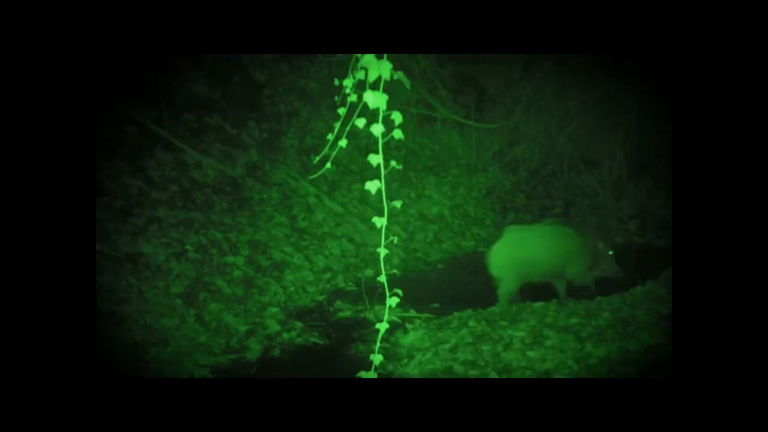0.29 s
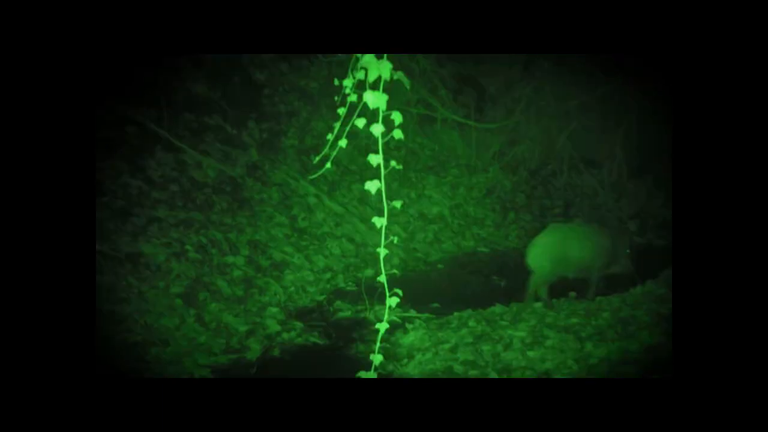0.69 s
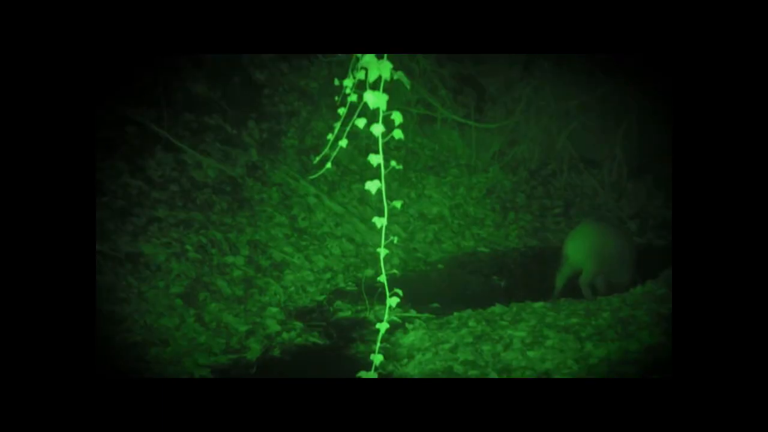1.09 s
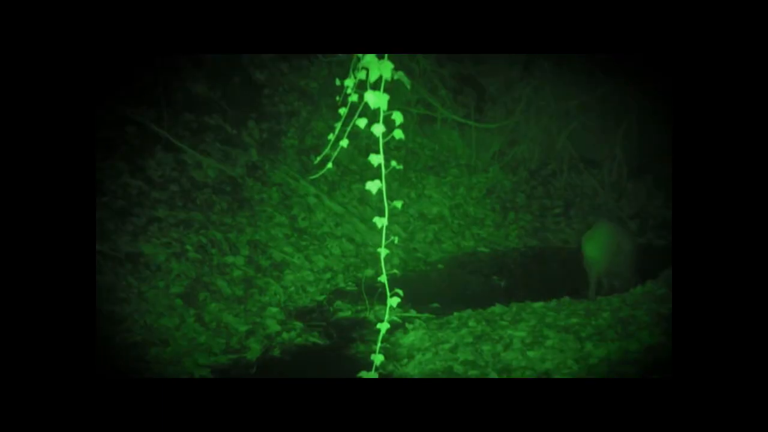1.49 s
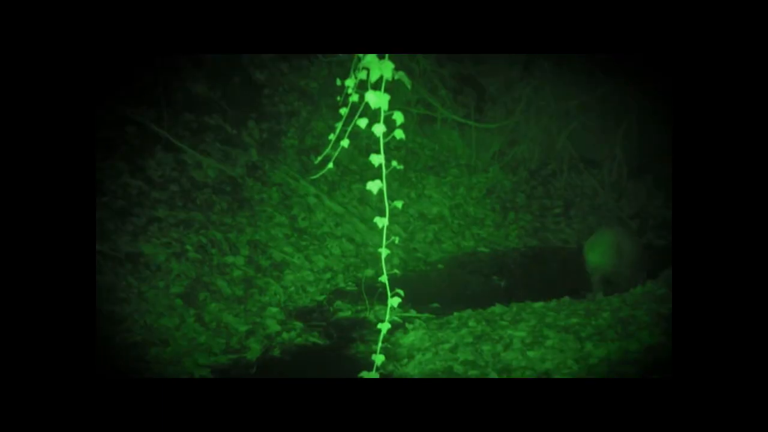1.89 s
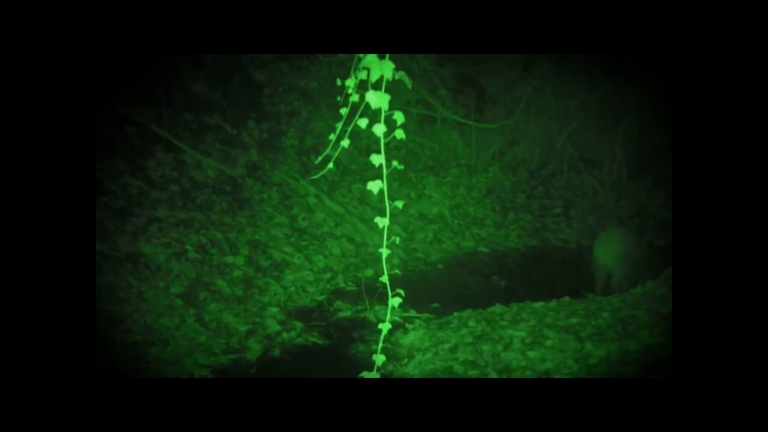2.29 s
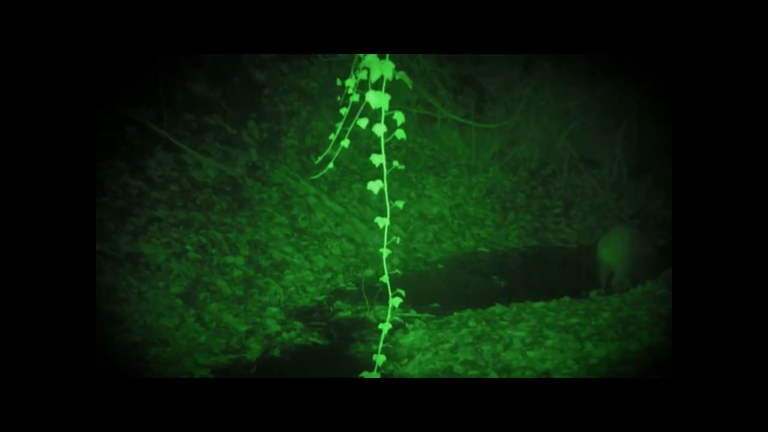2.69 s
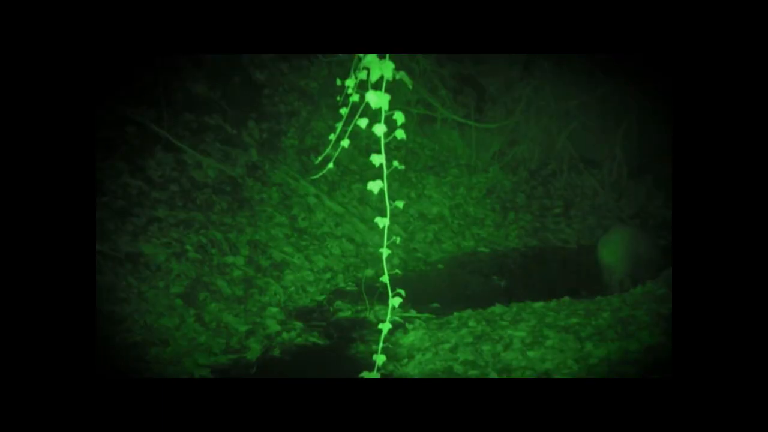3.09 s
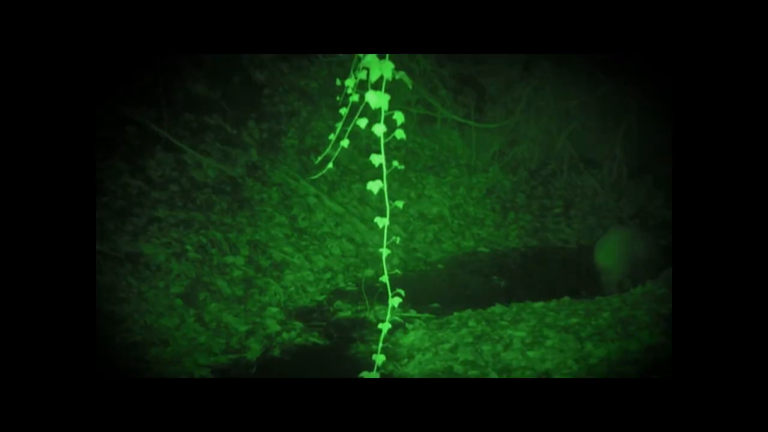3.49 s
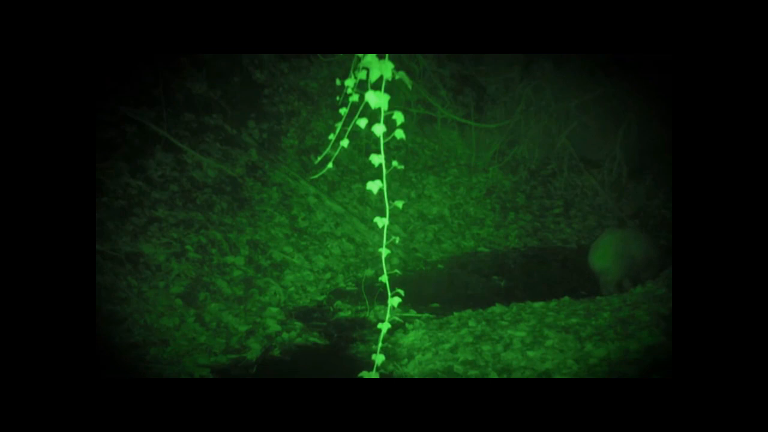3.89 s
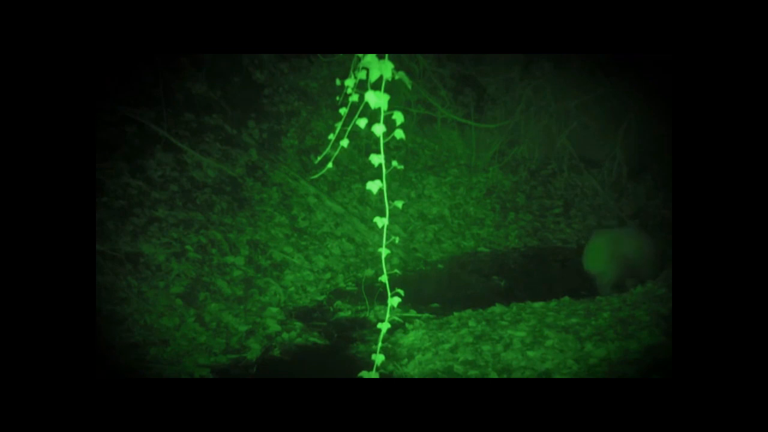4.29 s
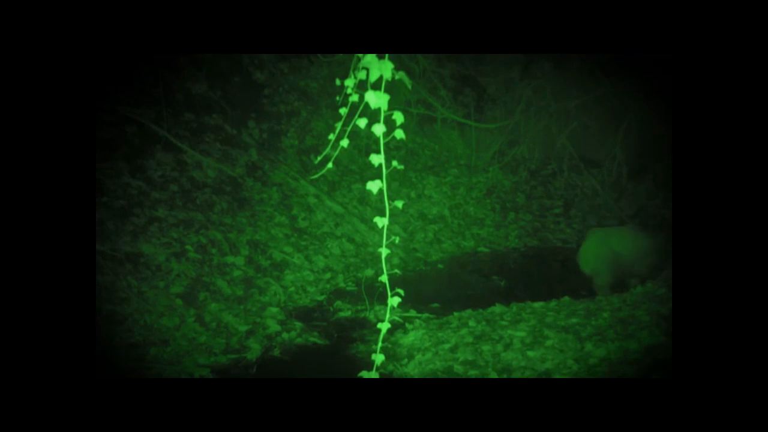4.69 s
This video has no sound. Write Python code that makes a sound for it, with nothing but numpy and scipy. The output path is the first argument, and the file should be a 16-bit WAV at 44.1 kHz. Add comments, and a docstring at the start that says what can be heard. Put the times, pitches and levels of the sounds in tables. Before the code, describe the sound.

Faint night hiss and a thin high camera whine open, with a tiny triple click from the housing. Then a wild boar some metres away shoves through dry leaf litter: crackling swells, twigs snap, three short low grunts come between. The middle is loudest, then it eases, with two soft sniffs near the end. Mono, fixed camera microphone, outdoors on soft ground.

```python
"""Faint night hiss and a thin camera whine come first; the housing then ticks once, three close clicks.
A wild boar roots through dry leaf litter some metres away: cracks and hiss swell at each shove.
Twigs snap as short rings with splintering noise; two sniffs are noise through nostril resonances.
Three grunts are slow vocal pulses ringing throat, mouth and snout over a chest hum."""
import sys
import numpy as np
from scipy import signal
from scipy.fft import rfft, irfft, next_fast_len
from scipy.io import wavfile
from scipy.ndimage import map_coordinates

SR = 44100
rng = np.random.default_rng(int(sys.argv[2]) if len(sys.argv) > 2 else 0)


def transcribe(signal):
    """Save signal, clipped to [-1, 1], as a 16-bit WAV file at the path in sys.argv[1]."""
    frames = np.atleast_2d(signal).T
    limited = np.clip(frames, -1, 1)
    pcm = np.round(limited * 32767).astype(np.int16)
    wavfile.write(sys.argv[1], SR, pcm)


def rack_gain(trim_db):
    """Turn a fader trim in dB into the linear factor to multiply a signal by."""
    fader = np.asarray(trim_db, float)
    return 10 ** (fader / 20)


N = 218293


def unit(x):
    """Scaled to rms 1."""
    return x / np.sqrt(np.mean(x ** 2) + 1e-20)


def along(points, hz):
    """(Hz, value) points interpolated on a log frequency axis."""
    point_hz, value = np.transpose(points)
    return np.interp(np.log(hz + 1), np.log(point_hz + 1), value)


def curves(rows):
    """One value per sample for each column after the time."""
    time_s, *columns = np.transpose(rows)
    return [np.interp(np.arange(N) / SR, time_s, column) for column in columns]


def wobble(knots_per_s):
    """A smooth random curve."""
    knots = rng.standard_normal(int(N * 200 / SR) + 4)
    return map_coordinates(knots, [np.arange(N) * knots_per_s / SR])


def filtered(x, response):
    """x times a complex response of frequency."""
    size = next_fast_len(N + SR // 2)
    return irfft(rfft(x, size) * response(np.fft.rfftfreq(size, 1 / SR)), size)[:N]


def resonances(hz, modes):
    """Causal response of (Hz, width Hz, dB) resonances, alternating in sign."""
    total = 0
    for k, (center_hz, width_hz, db) in enumerate(modes):
        band = 1j * hz * width_hz
        total = total + (-1) ** k * rack_gain(db) * band / (center_hz ** 2 - hz * hz + band)
    return total


def ground(x, t60_s, level_db):
    """x with the short scattered answer of soil and bushes, a decaying noise tail."""
    t = np.arange(SR // 4) / SR
    tail = rng.standard_normal(len(t)) * rack_gain(-60 * t / t60_s)
    return x + rack_gain(level_db) * signal.fftconvolve(x, tail / np.linalg.norm(tail))[:N]


# night hiss spectrum, relative: hz [Hz], density_db [dB per Hz]
NIGHT_SPECTRUM = [(15, -48), (25, -6.5), (455, 5.5), (796, 5), (1920, 1.5), (6350, -23), (7860, -47),
                  (8740, -34), (14500, -31)]


def night():
    """Faint steady hiss: noise shaped by a fixed spectrum."""
    noise = rng.standard_normal(N)
    return rack_gain(-51.5) * unit(filtered(noise, lambda hz: rack_gain(along(NIGHT_SPECTRUM, hz))))


# camera electronics tone: pitch_hz [Hz], sign_flips_per_s [1/s], base_db [dB]
WHINE_TONE = (7797.5, 59.3, -67)
# whine level: time_s [s], gain_db [dB re base]
WHINE_GAIN = [(0, -6), (.2, -8), (.45, 0.5), (4.95, 0.5)]


def whine():
    """Camera electronics whine: a sine that flips sign regularly, with soft flips."""
    t = np.arange(N) / SR
    pitch_hz, sign_flips_per_s, base_db = WHINE_TONE
    flips = np.tanh(6 * np.sin(np.pi * sign_flips_per_s * t))
    tone = np.sqrt(2) * rack_gain(base_db) * np.sin(2 * np.pi * pitch_hz * t) * flips
    return rack_gain(curves(WHINE_GAIN)[0]) * tone


# camera housing clicks: start_s [s], click_db [dB], thump_db [dB re click]
HOUSING_CLICKS = [(0.2307, -27.5, -14), (0.2405, -19, -9), (0.251, -38, -20)]
# housing flexing around the clicks: center_s [s], half_length_s [s], level_db [dB], corner_hz [Hz]
HOUSING_CREAK = (.237, .009, -38, 700)


def housing():
    """The housing flexes: sharp clicks with a rattling tail and a low thump, amid a dull noise creak."""
    out, t = np.zeros(N), np.arange(N) / SR
    u = t[:SR // 20]
    for start_s, click_db, thump_db in HOUSING_CLICKS:
        tail = 0.043 * rack_gain(-60 * u / 0.045) * rng.standard_normal(len(u))
        click = -np.exp(-u / .00008) + tail
        thump = -rack_gain(thump_db) * np.exp(-u / 0.0009) * np.cos(2 * np.pi * 45 * u)
        out[round(start_s * SR):][:len(u)] += rack_gain(click_db) * (click + thump)
    center_s, half_length_s, level_db, corner_hz = HOUSING_CREAK
    dull = unit(filtered(rng.standard_normal(N), lambda hz: 1 / (1 + 1j * hz / corner_hz) ** 2))
    return out + rack_gain(level_db) * np.exp(-((t - center_s) / half_length_s) ** 4) * dull


def sizes(luck, spread_db):
    """Most cracks are small, a few larger, none beyond what one leaf can give."""
    return rack_gain(-spread_db * np.log(1 - .995 * luck))


def grains(count, cycles, spread_db):
    """Tiny cracks at random times: damped rings of random pitch, flat in spectrum on average."""
    when, pitch, luck = rng.random((count, 3)).T
    hz = (150 * 100 ** pitch)[:, None]
    t = np.arange(320) / SR
    size = sizes(luck, spread_db)[:, None] * hz
    ring = size * np.sin(2 * np.pi * hz * t) * np.exp(-t * hz / cycles)
    at = (when * N).astype(int)[:, None] + np.arange(len(t))
    return unit(np.bincount(at.ravel(), ring.ravel())[:N])


def clicks(count, spread_db):
    """Cracks too short to ring: they fill every pitch at once."""
    when, luck, sign = rng.random((count, 3)).T
    size = sizes(luck, spread_db) * np.sign(sign - .5)
    return unit(np.bincount((when * N).astype(int), size, N))


# leaves settling between the shoves: time_s [s], crunch_db [dB]
SETTLING = [(0.0, -65.5), (0.27, -57.5), (0.46, -37.5), (0.7, -47), (0.92, -46.5), (1.13, -45),
            (1.43, -47.5), (1.75, -44), (2.15, -44.5), (2.35, -31.5), (2.6, -36.5), (3.06, -41),
            (3.46, -39), (3.6, -41.5), (3.9, -42.5), (4.0, -45.5), (4.5, -49), (4.95, -43.5)]
# hooves and snout shoving the litter:
# peak_s [s], crunch_db [dB], rise_s [s], fall_s [s], crumbs_db [dB re crunch]
SHOVES = [(0.333, -40.5, .043, 0.04, -23.5), (0.368, -35.5, 0.0069, 0.012, -40),
          (0.468, -40, .0067, 0.0072, -31), (0.502, -30.5, 0.0018, 0.011, -29),
          (0.653, -45, 0.028, 0.048, -43), (0.806, -41.5, 0.01, 0.0082, -36),
          (0.918, -42.5, .031, .019, -24), (1.043, -41, 0.024, 0.019, -23),
          (1.104, -37.5, 0.0054, 0.022, -25), (1.183, -39, 0.013, 0.0073, -36),
          (1.225, -37, 0.019, 0.022, -23), (1.267, -37, 0.026, 0.03, -29), (1.395, -37.5, 0.01, 0.045, -27),
          (1.492, -39.5, 0.031, 0.039, -24), (1.586, -33.5, 0.0097, 0.047, -28.5),
          (1.716, -35.5, 0.024, 0.019, -25), (1.818, -36.5, 0.04, .027, -28),
          (1.921, -38.5, 0.03, 0.04, -30), (2.045, -43, 0.0085, 0.025, -19), (2.113, -32, 0.01, 0.011, -16),
          (2.168, -33.5, 0.022, 0.015, -20.5), (2.232, -23, .0015, 0.021, -24),
          (2.29, -33, .025, 0.034, -21.5), (2.422, -30.5, 0.039, 0.027, -25.5),
          (2.473, -30.5, .002, 0.047, -20), (2.618, -34.5, 0.0058, 0.011, -31),
          (2.691, -27.5, 0.016, .039, -21.5), (2.853, -28, 0.0069, 0.03, -25.5),
          (2.958, -36.5, 0.12, 0.012, -23.5), (3.122, -27.5, 0.026, 0.031, -21.5),
          (3.22, -30, 0.0022, 0.023, -32), (3.267, -36, 0.0058, 0.015, -40),
          (3.328, -29.5, 0.013, 0.013, -20), (3.35, -29, 0.011, 0.016, -22.5),
          (3.441, -31, 0.0024, 0.0084, -19), (3.496, -31, 0.013, .013, -21),
          (3.569, -36, 0.004, 0.023, -26), (3.605, -32, 0.039, 0.033, -25), (3.782, -36, 0.017, .022, -35),
          (3.848, -30.5, 0.032, 0.027, -21), (4.036, -36, 0.009, 0.023, -26),
          (4.138, -38.5, 0.064, 0.052, -22), (4.42, -40.5, 0.068, 0.11, -23),
          (4.652, -34.5, 0.033, 0.014, -24), (4.685, -37.5, .01, 0.025, -25),
          (4.93, -45.5, 0.016, .03, -19)]
# the boar walks from a drift of big leaves onto finer litter: time_s [s], big_leaves_db [dB re crunch]
LEAF_DRIFT = [(0, 1), (.7, 0.5), (1.3, 0), (2.0, -3), (2.24, -8), (2.3, 2.5), (2.38, -10), (3.0, -9.5),
              (4.0, -6), (4.95, -8)]


def stirring():
    """Levels of crunch, big leaves and crumbs: each shove adds power over the settling litter."""
    t = np.arange(N) / SR
    crunch_power = rack_gain(curves(SETTLING)[0]) ** 2
    crumbs_power = crunch_power * rack_gain(-25) ** 2
    for peak_s, crunch_db, rise_s, fall_s, crumbs_db in SHOVES:
        width_s = np.where(t < peak_s, rise_s, fall_s)
        swell = rack_gain(crunch_db) ** 2 * np.exp(-((t - peak_s) / width_s) ** 2)
        crunch_power = crunch_power + swell
        crumbs_power = crumbs_power + rack_gain(crumbs_db) ** 2 * swell
    big_power = crunch_power * rack_gain(curves(LEAF_DRIFT)[0]) ** 2
    return np.sqrt([crunch_power, big_power, crumbs_power])


# litter spectrum, relative within each band: hz [Hz], density_db [dB per Hz]
LITTER_SPECTRUM = [(18, -62), (30, -33), (70, -19.5), (131, -20), (316, -10), (529, -4.5), (602, -2.5),
                   (1310, 5), (2840, 3.5), (4650, -7.5), (7400, -30), (8000, -34.5), (8640, -33.5),
                   (14500, -39.5)]


def leaves():
    """Cracks and hiss come in clumps; big leaves give the body, crumbs the crisp top."""
    rings = grains(count=16000, cycles=2.4, spread_db=3.0)
    cracks = .72 * rings + .25 * clicks(count=16000, spread_db=1.8)
    rustle = cracks + .7 * rng.standard_normal(N)
    clumped = rustle * rack_gain(1.53 * wobble(30) + 0.95 * wobble(90))

    def low(hz):
        return 1 / (1 + (hz / 1000) ** 4)

    def high(hz):
        return 1 / (1 + (6500 / (hz + 1)) ** 8)

    def middle(hz):
        return 1 - low(hz) - high(hz)

    def band(share):
        return unit(filtered(clumped, lambda hz: share(hz) * rack_gain(along(LITTER_SPECTRUM, hz))))

    return np.sum(stirring() * [band(middle), band(low), band(high)], axis=0)


# twigs and stiff leaves breaking: start_s [s], level_db [dB], ring_hz [Hz], crack_db [dB re level]
BREAKS = [(0.276, -31, 1200, 3), (0.325, -25, 684, 1), (0.363, -22, 640, -3), (0.5, -29.5, 590, 16.5),
          (0.794, -38, 820, -3), (1.099, -25, 1110, 5), (1.166, -28, 1130, 4), (1.388, -22, 1120, -1.5),
          (1.485, -29, 1340, 10.5), (1.57, -24, 848, 4), (1.716, -25.5, 640, 6), (1.807, -25, 800, 5),
          (1.866, -24.5, 1690, 5), (1.911, -16.5, 970, -3), (1.973, -17, 1450, 1.5), (2.027, -30, 990, 9.5),
          (2.098, -19, 1250, -2.5), (2.16, -22.5, 1700, 1), (2.23, -11, 2440, -3), (2.368, -22, 1940, 2),
          (2.47, -12, 1990, -9), (2.826, -15.5, 1640, -0.5), (2.849, -16, 1900, 0), (3.012, -32, 1500, 7),
          (3.045, -23.5, 1320, 8.5), (3.219, -22.5, 680, 5.5), (3.261, -9.5, 1090, -5),
          (3.346, -21, 1430, 11), (3.413, -13.5, 1590, 7), (3.4395, -24, 2160, 9), (3.479, -17.5, 1380, 3),
          (3.567, -25, 1790, 4), (3.58, -40, 8300, 10), (3.825, -28, 1260, 12), (3.86, -27, 990, -3),
          (4.046, -17, 1330, -1), (4.069, -26, 1220, 5), (4.121, -32, 950, 7), (4.148, -33, 910, -7),
          (4.399, -29, 850, 9.5), (4.465, -22, 1440, 0), (4.629, -26, 1210, 6), (4.651, -24, 1500, 1)]


def snaps():
    """A break is a crack of a few cycles at its own pitch, then splintering noise with a crisp top."""
    out, t = np.zeros(N + SR), np.arange(SR // 10) / SR

    def wood(hz):
        return resonances(hz, [(1570, 730, 0)]) * resonances(hz, [(2060, 570, 0)])

    def crisp_top(hz):
        return resonances(hz, [(10000, 6400, 0)]) ** 2

    # filtered() yields N samples
    splinter = unit(filtered(rng.standard_normal(N + SR), wood))
    crisp = unit(filtered(rng.standard_normal(N + SR), crisp_top))
    for start_s, level_db, ring_hz, crack_db in BREAKS:
        start = round(start_s * SR)
        here = slice(start, start + len(t))
        cycle = t * ring_hz
        main = np.sin(2 * np.pi * cycle) * np.exp(-cycle / 1.6) * (1 - np.exp(-cycle / .2)) ** 2
        higher = .2 * np.sin(6.4 * np.pi * cycle) * np.exp(-cycle / .8) * (1 - np.exp(-cycle / .2))
        lower = 0.31 * np.sin(1.2 * np.pi * cycle) * np.exp(-cycle / 2.8) * (1 - np.exp(-cycle / 0.96))
        noise = np.resize(splinter[here] + rack_gain(-36) * crisp[here], len(t))
        rattle = 0.53 * noise * (1 - np.exp(-t / 0.0013)) * rack_gain(-60 * t / 0.014)
        out[here] += rack_gain(level_db) * (rack_gain(crack_db) * (main + higher + lower) + rattle)
    return filtered(out[:N], lambda hz: (1j * hz / (300 + 1j * hz)) ** 2)


# air drawn through the snout: start_s [s], length_s [s], level_db [dB]
BREATHS = [(4.213, 0.25, -46), (4.68, 0.17, -46.5)]
# nostril resonances, passed twice: center_hz [Hz], width_hz [Hz per pass], gain_db [dB per pass]
NOSTRIL_MODES = [(2160, 370, -3), (4450, 750, -15)]


def sniffs():
    """Breath of the boar hisses unsteadily in its nostrils."""
    t, draw, edge_s = np.arange(N) / SR, np.zeros(N), 0.026
    for start_s, length_s, level_db in BREATHS:
        end_s = start_s + length_s
        corners_s = [start_s, start_s + edge_s, end_s - edge_s, end_s]
        draw += rack_gain(level_db) * np.interp(t, corners_s, [0, 1, 1, 0])
    hiss = unit(filtered(rng.standard_normal(N), lambda hz: resonances(hz, NOSTRIL_MODES) ** 2))
    return draw * rack_gain(2.5 * wobble(25)) * hiss


# one list per grunt: time_s [s], pitch_hz [Hz, before jitter], effort_db [dB], throat_hz [Hz]
GRUNT_PATHS = [
    [(1.783, 79.3, -36, 200), (1.794, 78.5, -21, 200), (1.82, 74.2, -19, 260), (1.865, 63.4, -24.5, 246),
     (1.885, 61, -46, 240)],
    [(2.785, 79.5, -32, 239), (2.8, 75.7, -23, 245), (2.825, 80.8, -16.5, 300), (2.85, 86.2, -19, 272),
     (2.895, 79.6, -46, 270)],
    [(4.032, 80.3, -39, 280), (4.045, 78.4, -21, 278), (4.09, 71.5, -33, 244), (4.155, 57.9, -34, 244),
     (4.185, 54, -41, 220)],
]
# mouth and snout beside the moving throat ring: ring_hz [Hz], t60_s [s], level_db [dB re throat]
MOUTH_AND_SNOUT = [(173, 0.023, -6.5), (452, 0.03, -7.5), (640, 0.016, 3.5)]


def grunts():
    """Vocal pulses, strong and weak by turns at first, ring the tract over a hum that swells mid-grunt."""
    out, t = np.zeros(N + SR), np.arange(SR // 20) / SR
    throat_t60_s, weak_pulse_db, evens_out_s = 0.029, -18, 0.1
    hum_peak_db, hum_edge_db, hum_peak_share = -18, -40, 0.64  # re mean effort; re peak; of length

    def ring(hz, t60_s):
        return np.sin(2 * np.pi * hz * t) * rack_gain(-60 * t / t60_s) * (1 - np.exp(-t / 0.0021)) ** 2

    body = sum(rack_gain(level_db) * ring(hz, t60_s) for hz, t60_s, level_db in MOUTH_AND_SNOUT)
    for rows in GRUNT_PATHS:
        start, stop = round(rows[0][0] * SR), round(rows[-1][0] * SR)
        pitch_hz, effort_db, throat_hz = np.array(curves(rows))[:, start:stop]
        jitter = 1 + .02 * wobble(40)[start:stop]
        cycles = np.cumsum(pitch_hz * jitter) / SR
        share = np.linspace(0, 1, len(cycles))
        swell_db = np.interp(share, [0, hum_peak_share, 1], [hum_edge_db, 0, hum_edge_db])
        hum_db = effort_db.mean() + hum_peak_db + swell_db
        out[start:stop] += np.sqrt(2) * rack_gain(hum_db) * np.sin(2 * np.pi * cycles)
        pulses = np.flatnonzero(np.diff(np.floor(cycles + 1 / 4)))  # one per cycle
        for k, (at, luck) in enumerate(zip(pulses, rng.standard_normal(20))):
            weak_db = weak_pulse_db * (k % 2) * np.exp(-(at / SR / evens_out_s) ** 2)
            pulse_db = effort_db[at] + weak_db + 0.93 * luck
            out[start + at:][:len(t)] += rack_gain(pulse_db) * (ring(throat_hz[at], throat_t60_s) + body)
    return filtered(out[:N], lambda hz: hz ** 4 / (hz ** 4 + 50 ** 4))


def scene():
    """The boar over soft ground, heard from the camera."""
    camera = night() + whine() + housing()
    twigs = ground(snaps(), t60_s=0.49, level_db=-8)
    voice = ground(grunts(), t60_s=0.17, level_db=-6)
    return (camera + leaves() + twigs + sniffs() + voice)[None]


def low_pass(x):
    """Removes everything above the highest recorded frequency."""
    return signal.sosfilt(signal.butter(12, 15280, fs=SR, output="sos"), x)


def record(dry):
    """The camera keeps nothing above its band limit."""
    top_hz = 14600
    mix = filtered(dry[0], lambda hz: hz < top_hz)[None]
    return low_pass(mix)


dry = scene()
out = record(dry)
transcribe(out)
```